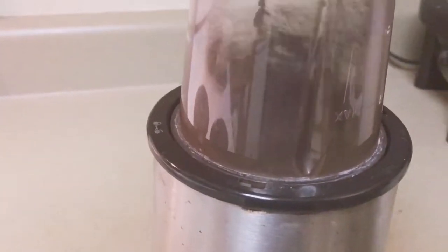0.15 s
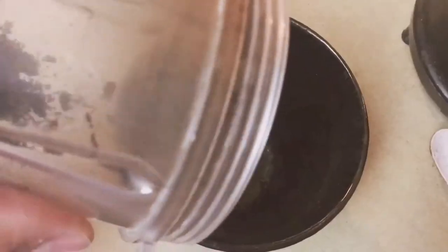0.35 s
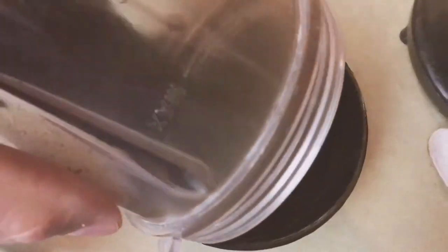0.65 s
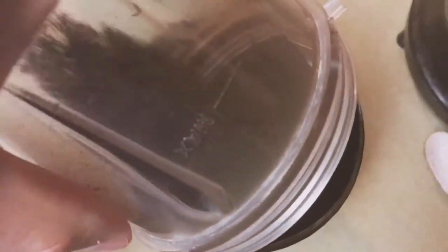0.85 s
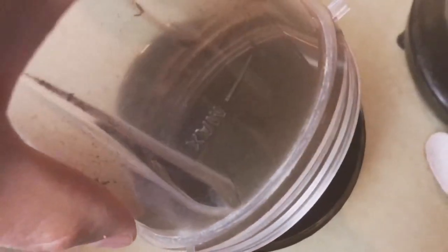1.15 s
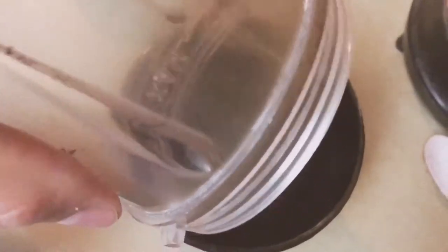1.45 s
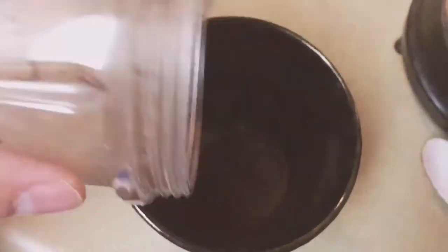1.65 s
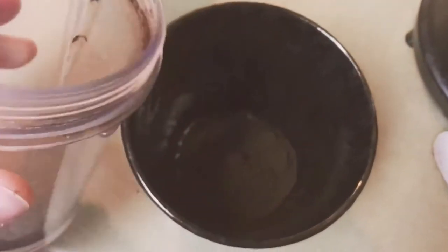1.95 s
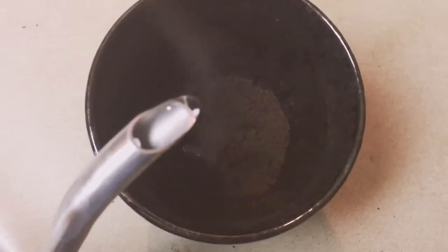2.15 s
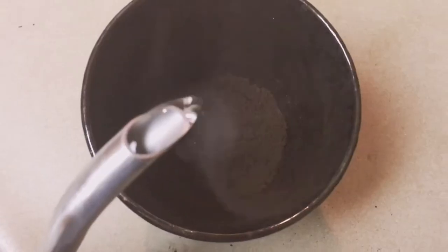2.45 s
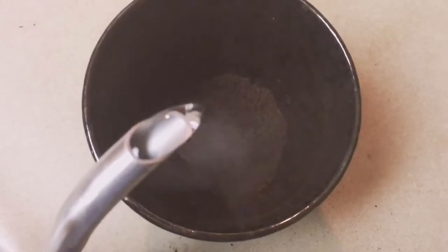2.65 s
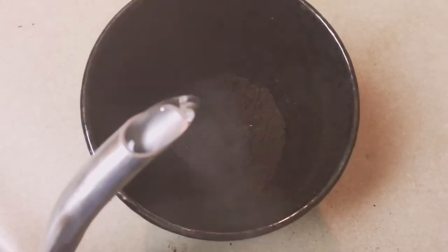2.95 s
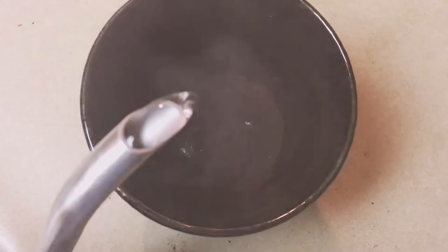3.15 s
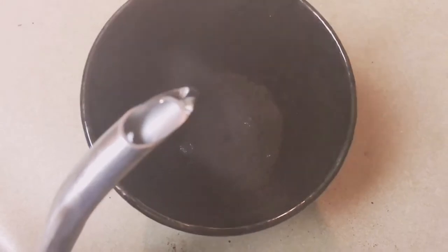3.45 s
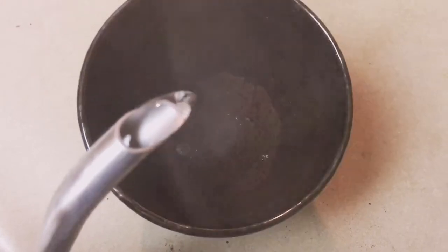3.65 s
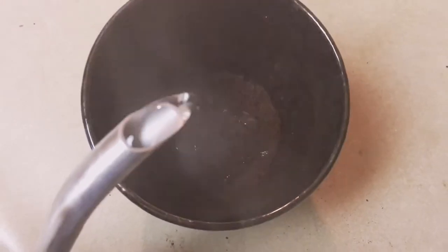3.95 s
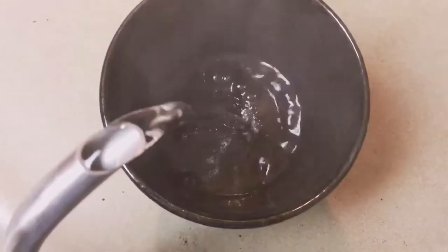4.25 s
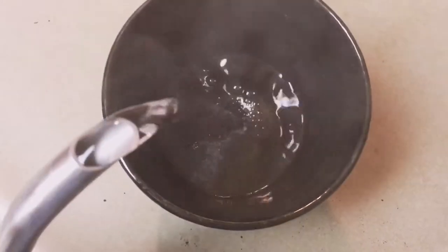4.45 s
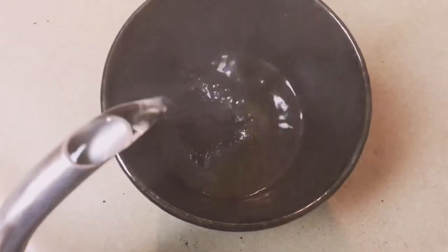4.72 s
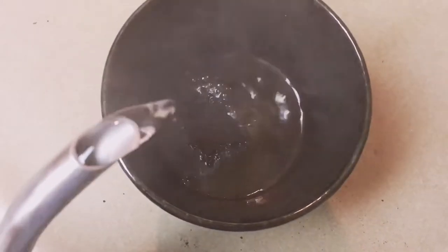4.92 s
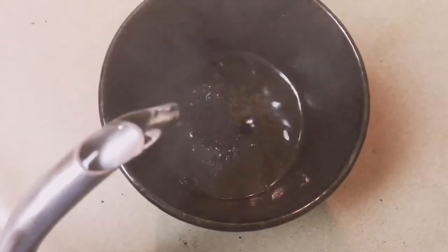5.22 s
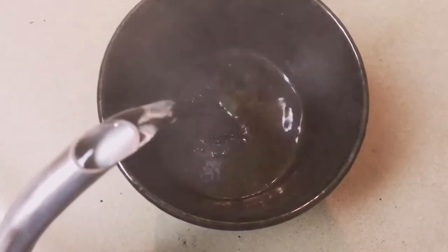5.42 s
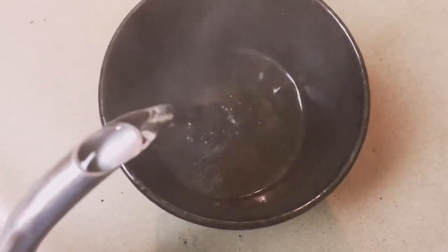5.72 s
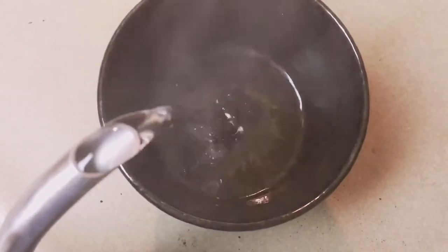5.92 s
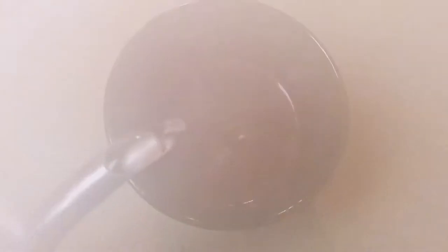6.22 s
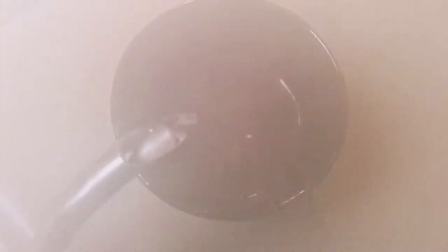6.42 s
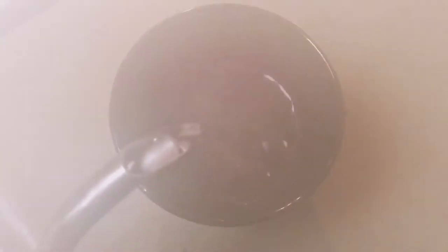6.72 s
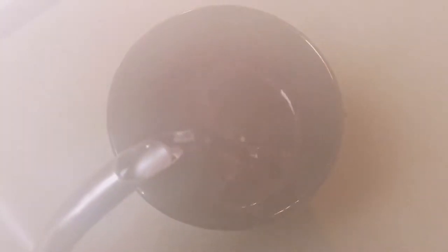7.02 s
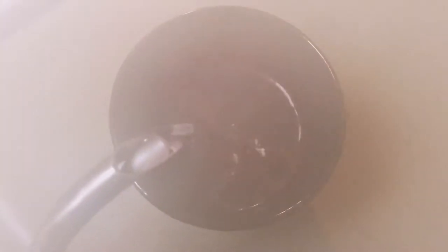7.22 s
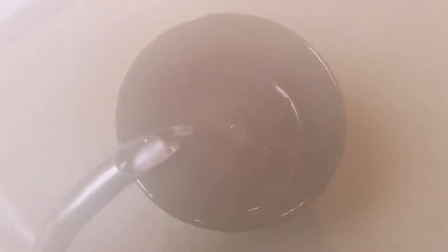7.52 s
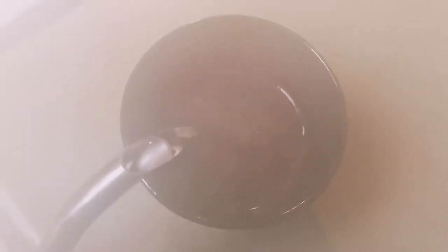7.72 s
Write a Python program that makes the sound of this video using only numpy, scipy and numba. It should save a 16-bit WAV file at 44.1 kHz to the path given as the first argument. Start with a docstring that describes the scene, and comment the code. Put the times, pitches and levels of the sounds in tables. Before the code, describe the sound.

In a quiet kitchen with a faint fridge hum, a close microphone catches a very short burst of an electric grinder. Uneven plastic taps on a ceramic bowl follow, with a whisper of falling powder and one harder knock. Then a thin, gentle stream of hot water runs onto the powder for the rest of the time, with fine crackling foam, small bubble pops and soft gurgles.

```python
"""A small blade grinder whirs close by for a quarter of a second, then the scene changes. Over the fridge hum
of a quiet kitchen, its plastic cup is tapped on a ceramic bowl while powder slides out, then dragged along the
rim and knocked again. From about two seconds on, hot water trickles onto the powder: foam fizzes and bubbles
pop, higher as the bowl fills, ringing the air above it."""
import sys
import numpy as np
from scipy import signal
from scipy.fft import rfft, irfft
from scipy.io import wavfile
from scipy.ndimage import uniform_filter1d
from numba import njit

SR = 44100
rng = np.random.default_rng(int(sys.argv[2]) if len(sys.argv) > 2 else 0)


def inscribe(sig):
    """Save sig as 16-bit PCM at rate SR to the path in sys.argv[1].

    A 1-D sig is mono; a 2-D sig holds one channel per row.
    Samples are clipped to [-1, 1] before scaling.
    """
    pcm = np.round(np.clip(np.atleast_2d(sig).T, -1, 1) * 32767)
    wavfile.write(sys.argv[1], SR, pcm.astype(np.int16))


N = 347029
SCENE_CHANGE_S, POUR_START_S = .2565, 2.107

# Bubble pitch as the bowl fills: time_s, pitch_hz
FILL_PITCH = [(2.11, 1056), (4.1, 1160), (4.4, 1210), (5.3, 1250), (6.1, 1300), (6.3, 1456), (7.87, 1430)]
# Ebb and swell of the pour: time_s, bubble_db, crackle_db, gurgle_db
POUR_LEVELS = [(2.11, -67, -59, -81), (2.25, -74, -70.5, -81), (2.7, -82.5, -71, -77),
               (3.2, -73.5, -76.5, -79.5), (3.42, -68, -71.5, -75), (3.75, -68.5, -74.5, -87),
               (4.07, -66, -70, -87), (4.43, -71.5, -66, -70), (4.65, -70.5, -66, -66),
               (4.93, -71, -66, -75), (5.4, -70.5, -69.5, -64.5), (5.65, -64.5, -71, -64),
               (6.09, -63, -71, -62), (6.31, -73, -76.5, -92), (6.58, -68, -69.5, -78.5),
               (6.9, -70, -71, -60.5), (7.35, -80, -74, -92), (7.87, -81, -78.5, -87)]


def undb(db):
    """Decibels to gain."""
    return 10 ** (np.asarray(db) / 20)


def level(x, db):
    """Set the rms level."""
    return x * undb(db) / np.sqrt(np.mean(x ** 2))


def curves(table):
    """Turn rows of (time_s, values...) into one automation curve a value column."""
    times, *values = np.transpose(table)
    return [np.interp(np.arange(N) / SR, times, column) for column in values]


@njit
def svf(x, hz, width):
    """State-variable band-pass whose centre may move; gain 1 at the centre."""
    y, band_state, low_state = np.empty(len(x)), 0., 0.
    for i in range(len(x)):
        tuning, damping = np.tan(np.pi * hz[i] / SR), width / hz[i]
        swing = (band_state + tuning * (x[i] - low_state)) / (1 + tuning * (tuning + damping))
        band_state = 2 * swing - band_state
        low_state += 2 * tuning * swing
        y[i] = damping * swing
    return y


def band(x, hz, width):
    """A steady or moving resonance; width in Hz."""
    return svf(x, np.clip(hz + np.zeros(len(x)), 10, .45 * SR), 1. * width)


def resonate(x, resonances):
    """Parallel resonances from rows of (centre_hz, width_hz, gain_db)."""
    return sum(undb(db) * band(x, hz, width) for hz, width, db in resonances)


def colour(x, points):
    """Equalise a noise through points of (freq_hz, gain_db)."""
    hz, db = np.transpose(points)
    grid = np.maximum(np.arange(len(x) // 2 + 1) * SR / len(x), 1)
    return irfft(rfft(x) * undb(np.interp(np.log(grid), np.log(hz), db)), len(x))


def walk(rate):
    """Smooth random drift, `rate` steps a second; spread near 1."""
    span = int(SR / rate)
    steps = np.repeat(rng.standard_normal(N // span + 1), span)
    return 1.5 * uniform_filter1d(uniform_filter1d(steps, span), span)[:N]


def grains(per_s, spread_db):
    """Random clicks of either sign with a long tail of big ones."""
    hit = rng.random(N) < per_s / SR
    return hit * rng.choice([-1., 1.], N) * undb(spread_db * np.minimum(rng.exponential(size=N), 4))


def fade(t, t60):
    """Exponential decay, 60 dB down after t60 seconds."""
    return np.exp(-np.log(1000) * t / t60)


def hold(start_s, length_s, edge_s=.027):
    """Soft rise, hold, soft fall."""
    t = np.arange(N) / SR - start_s
    return np.clip(np.minimum(t, length_s - t) / edge_s, 0, 1)


def ring(modes, push, scatter_db):
    """A set of modes driven by a short push, struck at a new place each time; peak 1."""
    t = np.arange(SR // 2) / SR
    place = undb(scatter_db * rng.standard_normal(len(modes)))
    y = sum(gain * undb(db) * np.sin(2 * np.pi * hz * t) * fade(t, t60)
            for gain, (hz, db, t60) in zip(place, modes))
    y = signal.fftconvolve(y, push)[:len(t)]
    return y / np.abs(y).max()


def burst(hz, width, t60):
    """A short noisy push ringing one resonance; peak 1."""
    t = np.arange(SR // 12) / SR
    y = band(rng.standard_normal(len(t)) * fade(t, t60), hz, width)
    return y / np.abs(y).max()


def add(out, start_s, sound):
    """Mix a sound in at a time."""
    i = int(start_s * SR)
    out[i:i + len(sound)] += sound[:len(out) - i]


def kitchen():
    """Smooth room tone under a fridge: a mains hum and a wavering drone."""
    # Fridge drone: centre_hz, width_hz, level_db
    drone_bands = [(54.7, 18, -65.5), (123, 59, -70.5), (249.9, 9.5, -77), (348.8, 17, -76.5)]
    # Room tone spectrum: freq_hz, gain_db
    room_colour = [(12, -41.5), (20, -9.5), (122, -1.5), (143, -14), (172, -15.5), (330, -19), (502, -26.5),
                   (744, -18), (894, -21), (1290, -28), (1470, -25.5), (2620, -30.5), (8740, -32),
                   (9710, -31), (10500, -54), (13600, -81), (22000, -120)]
    drone = sum(level(band(rng.standard_normal(N), hz, width), db) for hz, width, db in drone_bands)
    mains_hz = 118.7 * (1 + .01 * walk(3.2))
    mains = np.sin(2 * np.pi * np.cumsum(mains_hz) / SR) * undb(1.6 * walk(3))
    room = colour(rng.standard_normal(N), room_colour)
    return drone + level(mains, -65) + level(room, -66.5)


def drag():
    """Light friction of cup on rim: an arching scrape, the lowest cup mode humming, a brief bright rub."""
    # Scrape along the rim: time_s, pitch_hz, level_db
    scrape_path = [(1.3, 2006, -96), (1.46, 2080, -84), (1.56, 2230, -84.5), (1.67, 2400, -78.5),
                   (1.71, 2350, -76.5), (1.78, 2200, -80), (1.82, 2250, -91.5)]
    # Spells of cup hum: start_s, length_s, start_db
    hum_spells = [(0.256, 0.15, -55), (0.773, 0.18, -55.5), (1.437, 0.57, -60)]
    # Colour of the rub: centre_hz, width_hz, gain_db
    rub_bands = [(4500, 250, 0), (5310, 250, 1.5), (5850, 170, 0.5)]
    t, sag_db_per_s = np.arange(N) / SR, 26
    hz, scrape_db = curves(scrape_path)
    slip = rng.standard_normal(N) * undb(2.3 * walk(40))
    scrape = undb(scrape_db) * level(band(band(slip, hz, 400), hz, 400), 0)
    hum_gain = sum(undb(db - sag_db_per_s * (t - start_s)) * hold(start_s, length_s)
                   for start_s, length_s, db in hum_spells)
    hum = hum_gain * level(band(slip, 320, 12), 0)
    rub = hold(start_s=1.695, length_s=.105) * level(resonate(slip, rub_bands), -75)
    return scrape + hum + rub


def powder():
    """Fine grains hiss down the cup wall and keep the bowl faintly singing."""
    # Flow of the slide: time_s, hiss_db, sing_db
    slide_levels = [(0.26, -72, -75), (0.37, -99, -84.5), (0.538, -72.5, -73), (0.648, -64, -67.5),
                    (0.768, -61.5, -67.5), (0.862, -59, -65), (0.986, -62.5, -68), (1.076, -73, -99),
                    (1.3, -93.5, -93)]
    # Peaks in the hiss: centre_hz, width_hz, gain_db
    hiss_bands = [(4570, 170, -11), (5676, 70, -11.5), (6460, 170, -3), (7540, 86, -4.5), (8100, 160, -0.5),
                  (9630, 18, 0)]
    # Bowl and cup under a rain of grains: centre_hz, width_hz, relative_db
    sing_bands = [(1707, 30, -1), (2230, 200, -12.5), (2540, 50, 7), (3106, 70, -2.5), (4320, 60, -10.5),
                  (5470, 47, -8.5), (5723, 60, -3.5)]
    hiss_db, sing_db = curves(slide_levels)
    flow = rng.standard_normal(N) + .6 * grains(per_s=1500, spread_db=4)
    hiss = .6 * band(flow, 6500, 5000) + resonate(flow, hiss_bands)
    sing = sum(level(band(flow, hz, width), db) for hz, width, db in sing_bands)
    return undb(hiss_db) * level(hiss, 0) + undb(sing_db) * level(sing, 0)


def taps():
    """Each contact chatters briefly, knocking the cup, ringing the bowl and thudding the counter."""
    # Cup on bowl: start_s, knock_db, ring_db, crack_db, thud_db, chatter_t60_s, hardness_db
    # (ring, crack and thud are relative to the knock)
    contacts = [(0.259, -41.5, -20.5, -3.5, -5.5, 0.019, 5), (0.299, -47, -9.5, -23, 1, 0.035, -13),
                (0.434, -33.5, -8.5, -22, -14.5, 0.067, 16), (0.584, -33, -10.5, -17.5, -15.5, 0.1, 10),
                (0.776, -35.5, -26, -23, -12, 0.042, -28), (0.907, -41.5, -34, -8, -28, 0.035, 1.5),
                (0.924, -35.5, -20.5, -7, -10, 0.021, 27), (0.949, -38.5, -31, -8, -19, 0.033, 15),
                (1.189, -53.5, -29, -29, 5.5, 0.051, -16), (1.335, -46.5, -32, -30, 3, 0.084, -22),
                (1.359, -45.5, -30, -16.5, 5, 0.098, -24), (1.39, -47, -27.5, -29, 4, 0.044, -18),
                (1.852, -19.5, -16.5, -0.5, -40.5, 0.059, -4), (1.861, -17, -49.5, -14, -7.5, 0.067, 26),
                (2.024, -29.5, -17, -3, -12, 0.058, 24), (2.041, -36, -50, -12, 1.5, 0.017, -15)]
    # Plastic cup: pitch_hz, gain_db, t60_s
    cup_modes = [(334, -5.5, .12), (381.6, 2, 0.049), (510, 4, 0.019), (636, -13.5, 0.083),
                 (717, -5, 0.037), (834, 5, 0.033), (957, -0.5, 0.051), (1000, -16.5, 0.1),
                 (1080, 4.5, 0.039), (1560, -1, 0.01685), (1920, -1, 0.02), (2295, -2, 0.025)]
    # Ceramic bowl: pitch_hz, gain_db, t60_s
    bowl_modes = [(1707, 0, .33), (2545, -24, .2), (3060, -27, .16), (4330, -25, .22), (5290, -26, .17),
                  (5750, -32, .15), (7140, -33, .15)]
    # Counter top: pitch_hz, gain_db, t60_s
    counter_modes = [(71.1, -10.5, .15), (103.3, -7.5, 0.65), (147.7, 7, 0.24), (199.7, 4, 0.26)]
    # Rattle of the thin cup wall: centre_hz, width_hz, gain_db
    wall_bands = [(3100, 460, 11), (4540, 240, 11.5), (5196, 890, 9), (6700, 570, 6.5), (7486, 800, -11.5),
                  (8440, 500, -2)]
    out, t, impulse = np.zeros(N), np.arange(SR // 4) / SR, np.ones(1)
    swell = 1 - fade(np.arange(SR // 2) / SR, .011)  # the bowl takes one smooth shove
    thump = band(fade(t, .011), 120, 140)
    for start_s, knock_db, ring_db, crack_db, thud_db, t60, hardness_db in contacts:
        tail = .09 * fade(t, .35)  # the knock hangs on a little in the tiled room
        chatter = rng.standard_normal(len(t)) * (fade(t, t60) + tail)
        crack = resonate(chatter, wall_bands) + .075 * band(chatter, 6280, 7700)
        # a softer contact reaches only the low modes
        push = band(chatter, 290, 720) + undb(hardness_db) * chatter
        knock = ring(cup_modes, push, scatter_db=.61)
        bowl = undb(ring_db) * ring(bowl_modes, impulse, scatter_db=.69) * swell
        # a sharp crack also sets off the overtones of the bowl
        overtones = undb(crack_db - 16.5) * ring(bowl_modes[1:], impulse, scatter_db=2.5)
        thud = undb(thud_db) * ring(counter_modes, thump, scatter_db=1.1)
        add(out, start_s, undb(knock_db) * (knock + bowl + overtones + thud))
        add(out, start_s, undb(knock_db + crack_db) * crack / np.abs(crack).max())
    return out


def grinder():
    """Shaft harmonics throbbing with the mains buzz, and powder clattering in the cup."""
    # Swell of the motor: time_s, gain_db
    motor_swell = [(0.0, -24.5), (0.238, -20), (0.255, -21)]
    # Whine of a shaft with ten commutator bars: shaft_multiple, gain_db
    harmonics = [(1, 3), (2, -4.5), (3, -7), (5, -14.5), (7, -16), (10, -3), (14, -14), (20, -12), (30, -9),
                 (32, -22.5)]
    # Powder thrown round the cup: freq_hz, gain_db
    whirl_colour = [(20, -38.5), (60, -12.5), (150, -10), (220, -15), (400, -5), (520, -4), (650, -14),
                    (1000, -6), (1900, -9), (3500, -8), (5000, -10.5), (8000, -16.5), (9600, -18.5),
                    (10500, -40), (22000, -87)]
    # Resonances of cup and base: centre_hz, width_hz, gain_db
    housing_bands = [(2160, 170, 0), (2860, 60, 0), (3400, 370, 1), (3850, 92, -1.5), (4372, 120, 3.5),
                     (5900, 46, -3.5), (7900, 72, -2.5), (8770, 60, 5)]
    shaft_hz, buzz_hz = 266.5, 122.8
    motor_db, = curves(motor_swell)
    turns = np.cumsum(shaft_hz * (1 + .00078 * walk(21))) / SR
    phases = rng.random(len(harmonics))
    buzz = np.sin(2 * np.pi * buzz_hz * np.arange(N) / SR)
    whine = sum(undb(db) * np.sin(2 * np.pi * (multiple * turns + phase))
                for (multiple, db), phase in zip(harmonics, phases))
    whine *= 1 + .3 * buzz
    # the blade sweeps powder twice a turn; coarse bits crack against the wall
    swept = (1 + .3 * np.cos(4 * np.pi * turns)) * rng.standard_normal(N)
    whirl = colour(swept + .99 * grains(per_s=600, spread_db=3.9), whirl_colour)
    whirl += resonate(whirl, housing_bands)
    return undb(motor_db) * (level(whine, -4) + level(buzz, -14.5) + level(whirl, -1.2))


def trickle():
    """Countless tiny pops ring round the same pitch; foam fizzes above, the pool gurgles below."""
    # Colour of the crackle in the bowl: centre_hz, width_hz, gain_db
    foam_bands = [(3660, 500, -0.5), (5820, 750, 2.5), (8240, 530, -1)]
    fill_hz, = curves(FILL_PITCH)
    bubble_db, crackle_db, gurgle_db = curves(POUR_LEVELS)
    drops = grains(per_s=130, spread_db=5.34) + .095 * rng.standard_normal(N)
    drops *= undb(3 * walk(25))  # the smallest drops come in loose clusters
    foam = grains(per_s=600, spread_db=4.2) + .3 * rng.standard_normal(N)
    bubble_hz = fill_hz * (1 + .061 * walk(40))
    bubbles = band(band(drops, bubble_hz, 400), bubble_hz, 400)
    crackle = resonate(foam + .34 * drops, foam_bands)
    gurgle = band(band(drops, 270, 240), 270, 160) + .34 * band(drops, 525, 240)
    return (undb(bubble_db) * level(bubbles, 0) + undb(crackle_db) * level(crackle, 0)
            + undb(gurgle_db) * level(gurgle, 0))


def spatter(count):
    """Rows for small pops at chance moments; level follows the flow, pitch follows the filling."""
    when, size, tint, detune = rng.random((count, 4)).T
    start_s = POUR_START_S + when * (N / SR - POUR_START_S)
    at = (start_s * SR).astype(int)
    fill_hz, = curves(FILL_PITCH)
    trickle_db, crackle_db, _ = curves(POUR_LEVELS)
    size_db = -2.5 * np.log(1 - .98 * size)  # mostly small, a few louder
    bubble_db, bubble_hz = trickle_db[at] + 12 + size_db, fill_hz[at] * (1 + .14 * (detune - .5))
    tick_db, tick_hz = crackle_db[at] + 16.5 + size_db, 2600 * 3.5 ** tint
    return list(zip(start_s, bubble_db, bubble_hz, tick_db, tick_hz))


def pops():
    """A film bursts with a tick; a bubble rings for a few cycles and the pool glugs."""
    # The larger pops: start_s, bubble_db, bubble_hz, tick_db, tick_hz
    big_pops = [(2.12, -55, 1040, -30.5, 6330), (2.139, -57, 1110, -35.5, 2920),
                (2.1448, -45, 1040, -36, 3220), (2.1575, -63, 1080, -30.5, 2800),
                (2.365, -67.5, 1060, -44.5, 3460), (2.9622, -45, 1700, -41.5, 3540),
                (3.34, -43, 1240, -59, 2730), (3.3596, -42.5, 1160, -47.5, 3210),
                (3.5628, -50, 1260, -48.5, 3330), (3.5985, -18.5, 1140, -38, 3300),
                (3.6245, -39, 1080, -42.5, 3300), (3.6934, -41.5, 1120, -54, 4040),
                (3.746, -44, 1120, -50, 2720), (3.7817, -45, 1090, -41, 2900),
                (3.925, -45, 1120, -54, 6220), (4.0165, -43, 1150, -47, 3300),
                (4.0275, -34.5, 1090, -40, 3200), (4.1081, -38, 1100, -39, 5740),
                (4.157, -43.5, 1070, -52, 2580), (4.246, -34, 1200, -40.5, 3400),
                (4.3187, -44, 1320, -44, 3330), (4.336, -42.5, 1220, -44, 5780),
                (4.3725, -43.5, 1240, -43, 6300), (4.4088, -46, 1260, -35, 9000),
                (4.4375, -71, 1280, -35.5, 6000), (4.4544, -37.5, 1210, -35, 7050),
                (4.4702, -36, 1170, -47, 5240), (4.5338, -39.5, 1280, -43.5, 3170),
                (4.558, -42, 1130, -56, 9090), (4.5861, -37.5, 1250, -44, 5890),
                (4.61, -41.5, 1150, -44, 3310), (4.6288, -45.5, 1130, -39.5, 5980),
                (4.6875, -45.5, 1120, -42.5, 5740), (4.7681, -41, 1260, -33, 6900),
                (4.8318, -28, 1175, -33.5, 3280), (4.852, -33.5, 1150, -36.5, 6000),
                (4.8888, -39.5, 1230, -43, 8900), (4.9142, -69, 1400, -38, 8900),
                (5.024, -44.5, 1140, -40, 6300), (5.0379, -37.5, 1240, -49, 6250),
                (5.112, -44, 1280, -39, 6230), (5.1282, -39, 1270, -31.5, 6600),
                (5.1744, -37.5, 1170, -31.5, 5650), (5.2763, -38.5, 1280, -34, 5700),
                (5.2995, -38, 1430, -36, 3900), (5.3519, -42, 1280, -46, 3540),
                (5.4535, -34.5, 1405, -60, 2610), (5.5598, -35.5, 1260, -44, 6160),
                (5.6023, -53, 1120, -45, 5860), (5.625, -31, 1250, -37, 5400),
                (5.695, -41, 1190, -51, 3370), (5.7177, -39, 1410, -29.5, 6000),
                (5.8311, -43, 1160, -52, 2730), (5.8439, -37.5, 1340, -48.5, 3060),
                (5.882, -39.5, 1300, -59, 5910), (5.9414, -36, 1500, -35.5, 3710),
                (5.9692, -35.5, 1140, -44, 5660), (6.0705, -32.5, 1150, -35, 3400),
                (6.089, -37, 1160, -42, 2950), (6.1386, -42, 1460, -60, 2640),
                (6.1599, -40.5, 1420, -57, 3340), (6.2, -43, 1510, -52, 5990),
                (6.3106, -42, 1430, -61, 5810), (6.5803, -44.5, 1370, -61, 3790),
                (6.7314, -49, 1170, -36.5, 8900), (6.8116, -48, 1610, -41, 5700),
                (6.8332, -40.5, 1660, -33, 8450), (6.903, -37, 1420, -33.5, 5900),
                (6.9556, -43, 1380, -45, 3570), (6.9727, -39, 1600, -35.5, 3830),
                (7.2003, -46.5, 1450, -50, 5730), (7.2545, -47, 1385, -43.5, 8400),
                (7.555, -47.5, 1460, -60, 3570), (7.7524, -49, 1490, -51, 5660)]
    pool_s, shallow_db = 4.2, -9  # glugs are weaker until a pool has formed
    out, t = np.zeros(N), np.arange(SR // 12) / SR
    for start_s, bubble_db, bubble_hz, tick_db, tick_hz in big_pops + spatter(count=260):
        bubble = np.sin(2 * np.pi * bubble_hz * t) * fade(t, .016) * (1 - fade(t, .0035))
        bubble += .18 * burst(1.31 * bubble_hz, 400, t60=.0085)
        glug = burst(rng.uniform(170, 486), 310, t60=.042)
        glug_db = .59 * bubble_db + .41 * tick_db - 7.5 + shallow_db * (start_s < pool_s)
        tick = burst(tick_hz, .32 * tick_hz, t60=.0041) + .69 * burst(4900, 5600, t60=.0033)
        add(out, start_s, undb(bubble_db) * bubble + undb(glug_db) * glug + undb(tick_db) * tick)
    return out


def water():
    """Trickle and pops ring on in the air above the bowl and come back off the wall behind."""
    # Standing waves over the bowl: centre_hz, width_hz, gain_db
    air_bands = [(324, 20, -2.5), (538, 31, -3), (1016, 16.5, -0.5), (1108, 55, -1.5), (1210, 53, -8.5),
                 (1340, 60, -2.5), (1587, 140, -2.5), (1773, 69, -0.5), (1950, 38, -7)]
    echo_s, echo_db = .017, -19
    splash = trickle() + pops()
    in_bowl = .61 * splash + 1.28 * resonate(splash, air_bands)
    echo = np.roll(band(in_bowl, 1300, 2000), int(echo_s * SR))
    return in_bowl + undb(echo_db) * echo


def scene():
    """The grinder alone, then emptying and pouring over the kitchen tone, joined by hard cuts; mono."""
    t = np.arange(N) / SR
    at_bowl = np.where(t >= POUR_START_S, water(), taps() + powder() + drag()) + kitchen()
    return np.where(t < SCENE_CHANGE_S, grinder(), at_bowl)[None]


def record(dry):
    """A steep low-pass takes off the top treble."""
    cutoff_hz = 10300
    return signal.sosfilt(signal.ellip(10, .3, 75, cutoff_hz, fs=SR, output="sos"), dry)


dry = scene()
out = record(dry)
inscribe(out)
```